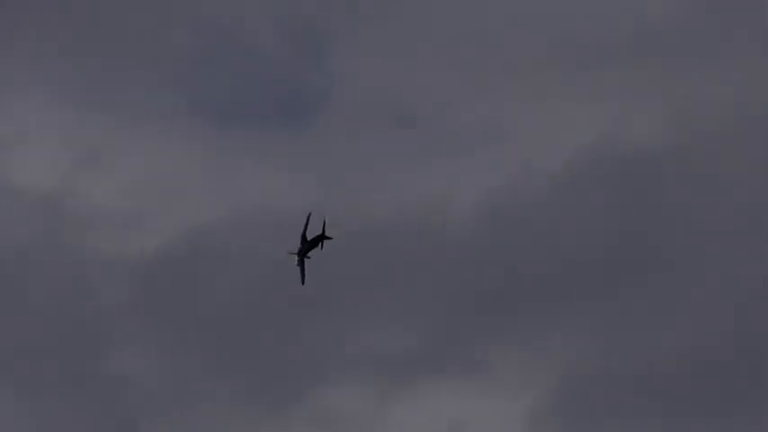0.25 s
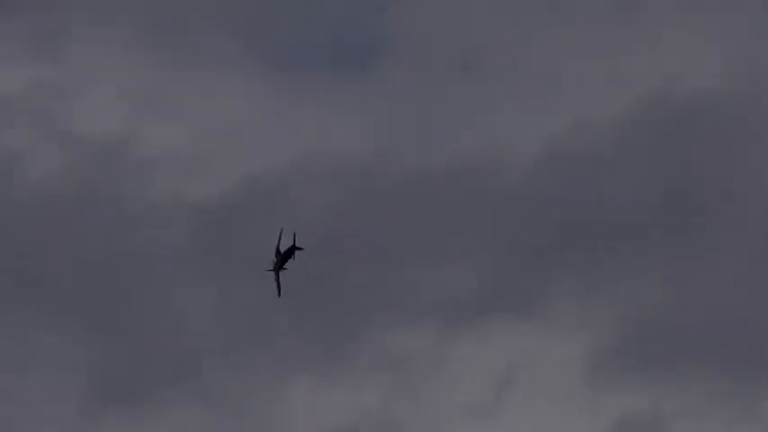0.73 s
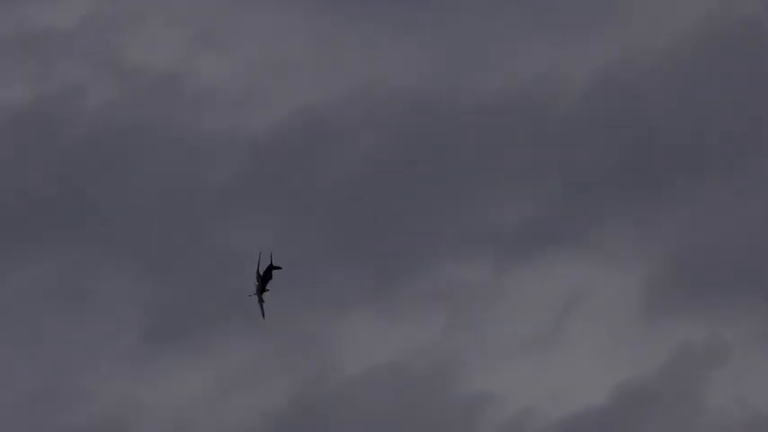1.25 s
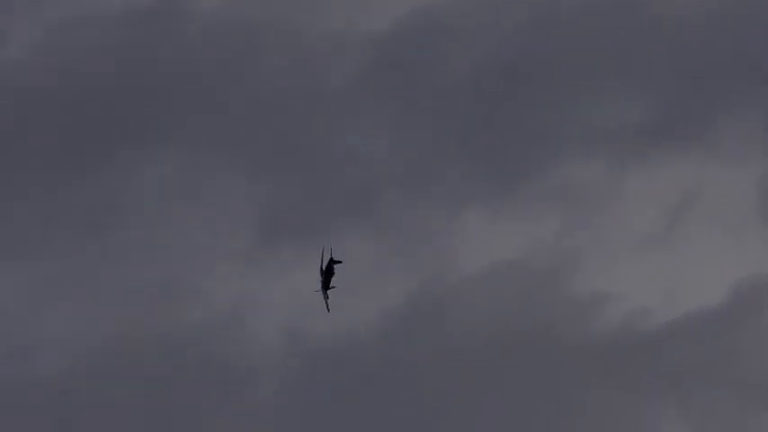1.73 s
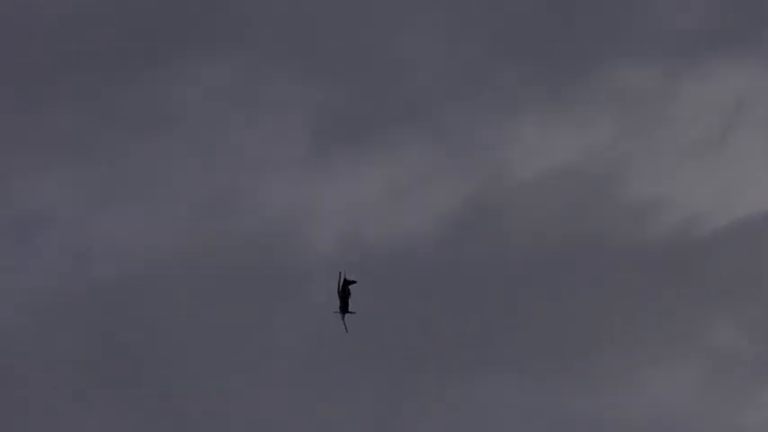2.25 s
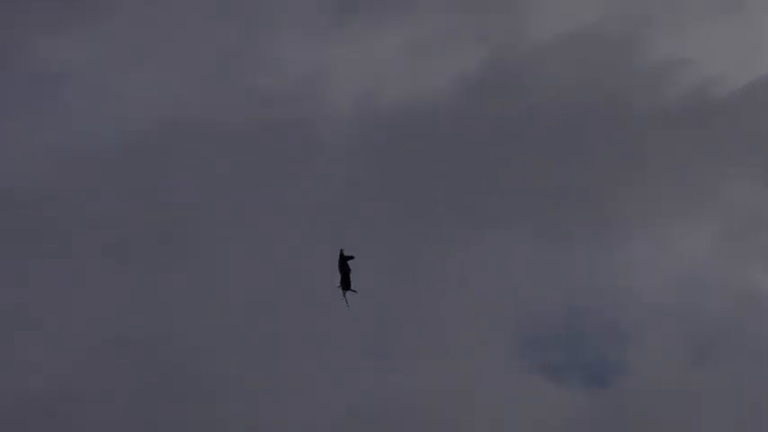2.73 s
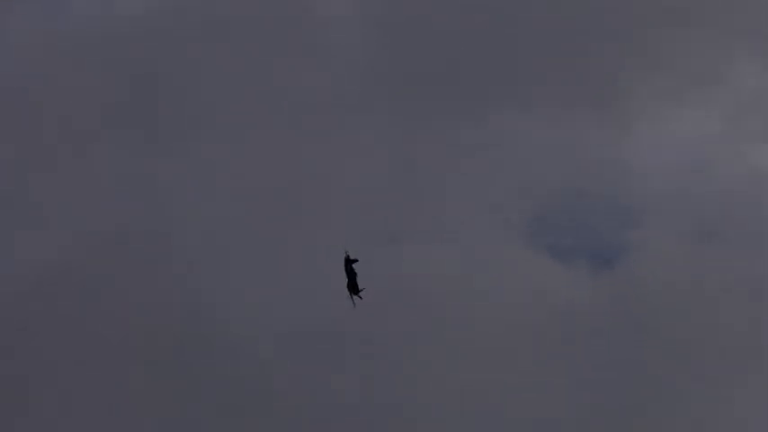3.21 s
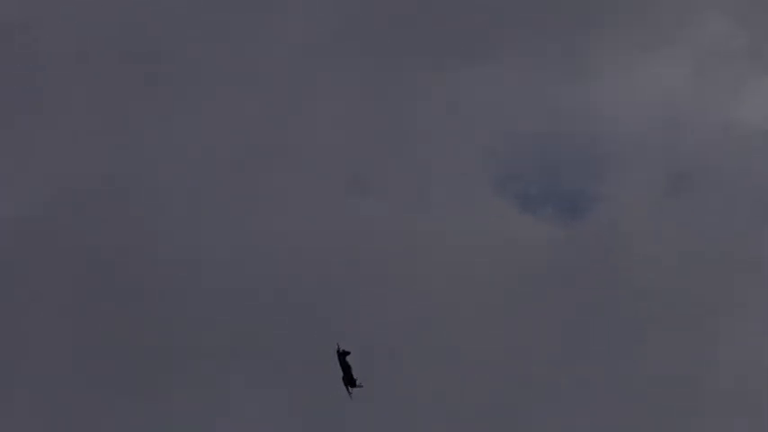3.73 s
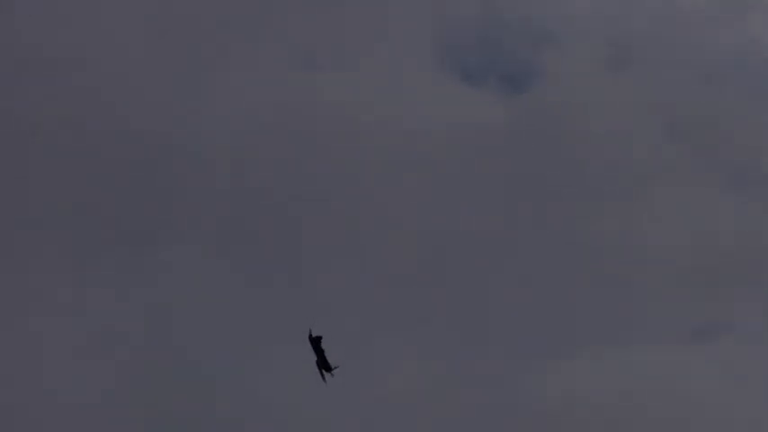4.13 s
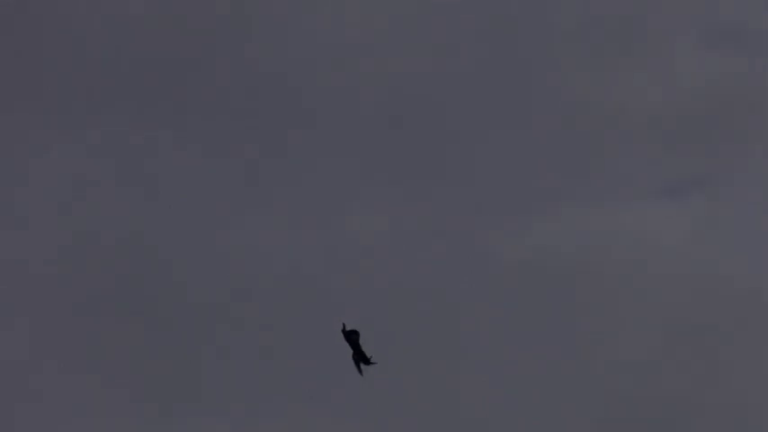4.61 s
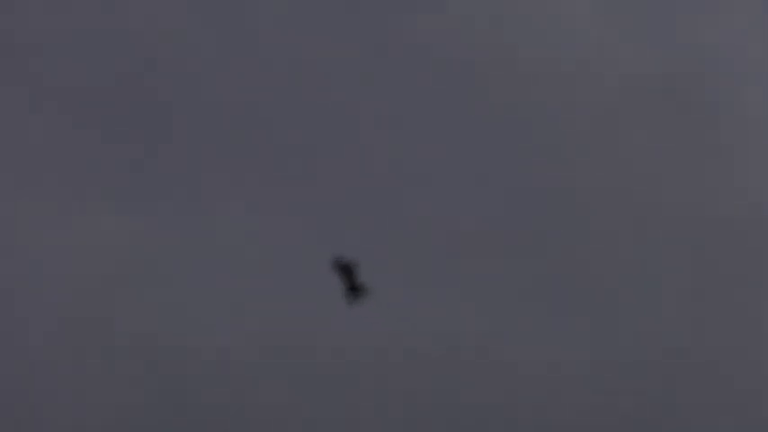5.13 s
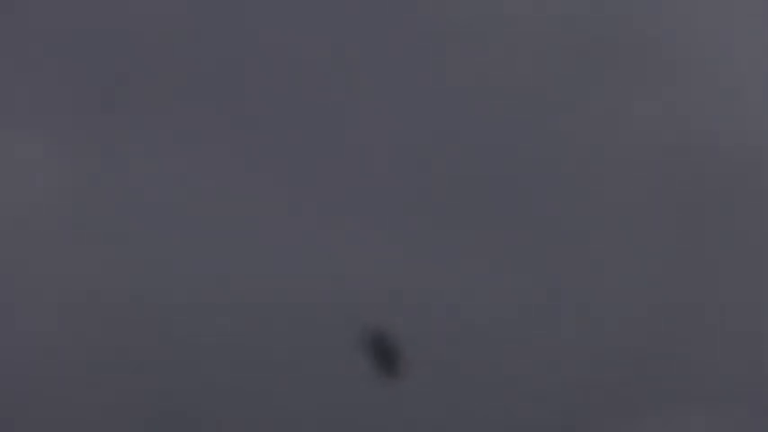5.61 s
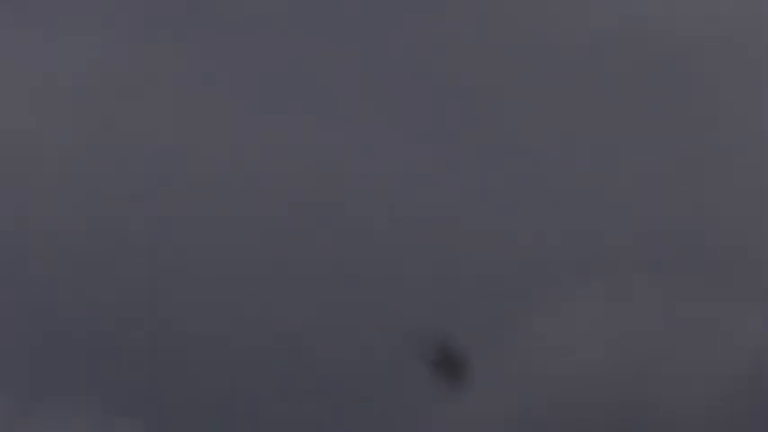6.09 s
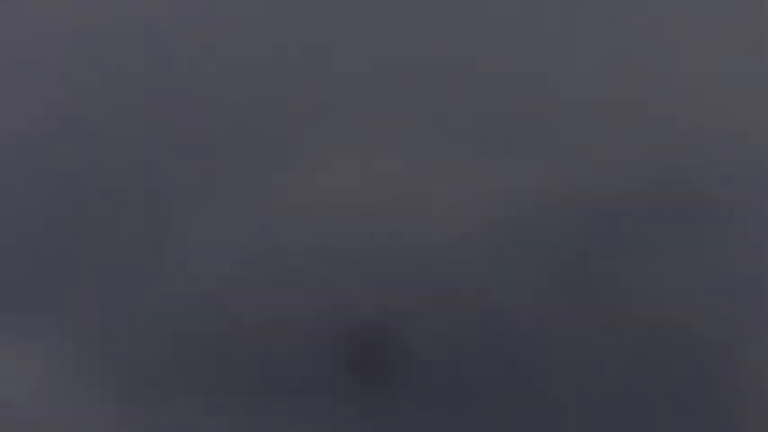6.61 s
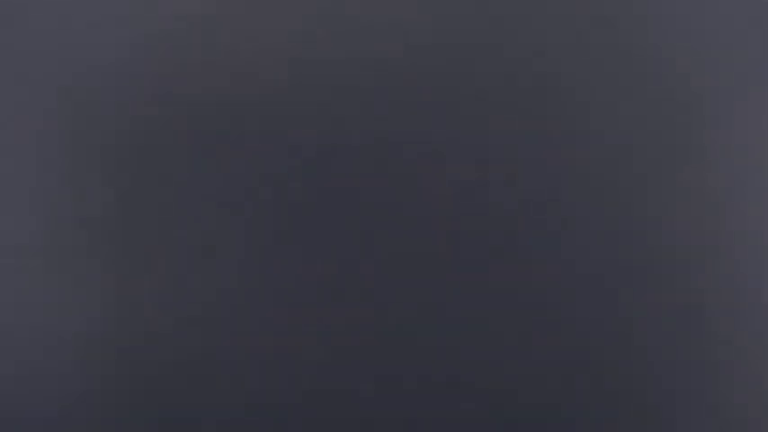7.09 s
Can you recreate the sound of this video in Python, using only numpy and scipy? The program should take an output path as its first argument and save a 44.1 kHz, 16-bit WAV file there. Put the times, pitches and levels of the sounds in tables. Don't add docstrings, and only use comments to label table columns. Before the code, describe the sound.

A large radial piston-engined plane wheels high over an open grass airfield, heard through a hand-held stereo microphone in wind. Its low, lumpy drone runs throughout, sagging slightly in pitch over the first two seconds, then very gradually rising. Above it a dull, gravelly exhaust rasp swells and fades with the air. A tight burst of hard cracks comes at 0.2-0.4 s, then scattered single barks, notably near 2.1, 3.5, 4.3 and around 6 s. A low blade hum is clear at first, faint around 4 s, and stronger again near 6.2 s. Wind thumps and dry cover rustle, crackles and snaps are busiest from 0.5 to 2.3 s, quieter around 3 s, returning near 6 s. At 4.45 s a click and split-second dropout interrupt everything. Toward 7 s the drone weakens and the rasp thins, still running at the end with a last snap.

```python
import sys
import numpy as np
from scipy import signal
from scipy.fft import rfft, irfft
from scipy.io import wavfile
from scipy.ndimage import uniform_filter1d

SR = 44100
rng = np.random.default_rng(int(sys.argv[2]) if len(sys.argv) > 2 else 0)


def volts_from_decibels(level):
    exponent = np.asarray(level, float) / 20
    return 10 ** exponent


def waveform_to_disk(signal):
    frames = np.transpose(np.atleast_2d(signal))
    scaled = np.clip(frames, -1, 1) * 32767
    samples = np.round(scaled).astype(np.int16)
    wavfile.write(sys.argv[1], SR, samples)


N = 324135
TIME = np.arange(N) / SR
CYLINDERS = 18
AIR_TOP_HZ = 2650

# (time [s], rate [Hz])
ENGINE_CYCLE = [(0.0, 17.59), (0.3, 17.624), (0.6, 17.398), (0.9, 17.318), (1.5, 17.131), (2.1, 17.017),
                (2.4, 17.033), (2.7, 17.044), (3.6, 17.049), (3.9, 17.034), (4.5, 17.12), (5.1, 17.195),
                (5.7, 17.235), (6.0, 17.201), (6.3, 17.297), (6.6, 17.354), (6.9, 17.383), (7.35, 17.375)]
# (time [s], peak [dB], ring [Hz])
HARD_BARKS = [(0.238, -18, 1170), (0.278, -15, 1020), (0.294, -12.5, 930), (0.311, -8, 730),
              (0.345, -10, 880), (0.376, -16, 937), (0.398, -14.5, 1150), (0.746, -17.5, 1750),
              (0.824, -16, 824), (1.257, -20, 1150), (1.374, -17, 1100), (1.501, -15.5, 1110),
              (2.076, -12.5, 1080), (2.732, -15, 940), (2.87, -22, 980), (3.485, -14.5, 1060),
              (3.604, -14, 1780), (3.67, -14.5, 920), (4.14, -17.5, 990), (4.197, -18, 1140),
              (4.257, -11.5, 980), (5.434, -16, 1070), (5.929, -15, 1020), (6.012, -17.5, 980),
              (6.127, -19, 930), (6.531, -18, 1030), (6.646, -18, 735), (6.706, -20, 759)]


def curve(table):
    return np.interp(TIME, *np.transpose(table))


def unit(x):
    return x / np.sqrt(np.mean(x ** 2))


def colour(x, points, size=8192):
    hz, db = np.transpose(points)
    bins_hz = np.fft.rfftfreq(size, 1 / SR)
    log_gain = np.interp(np.log(bins_hz + 1), np.log(hz), db) * np.log(10) / 20
    cepstrum = irfft(log_gain)
    cepstrum[1:size // 2] *= 2
    cepstrum[size // 2 + 1:] = 0
    response = irfft(np.exp(rfft(cepstrum)))[:size // 2]
    return signal.oaconvolve(x, response)[:N]


def band(x, lo_hz, hi_hz):
    return signal.sosfilt(signal.butter(2, [lo_hz, hi_hz], "bandpass", fs=SR, output="sos"), x)


def walk(rate):
    hold = int(SR / rate)
    held = np.repeat(rng.standard_normal(N // hold + 1), hold)
    return 1.87 * uniform_filter1d(uniform_filter1d(held, hold), hold)[:N]


def spikes(times, sizes):
    at = np.clip(times * SR, 0, N)
    i = at.astype(int)
    early = np.bincount(i, sizes * (i + 1 - at), N + 2)
    late = np.bincount(i + 1, sizes * (at - i), N + 2)
    return (early + late)[:N]


def puffs(kicks, decay_s):
    return signal.lfilter([1], [1, -np.exp(-1 / (decay_s * SR))], kicks)


def swells(s, half_s, gain_db):
    coarse = TIME[::64]
    total = np.zeros(len(coarse))
    for t, half, gain in zip(s, half_s, gain_db):
        total += gain * np.cos(np.pi / 2 * np.clip((coarse - t) / half, -1, 1)) ** 2
    return np.interp(TIME, coarse, total)


def field(x, gain_db, size=1024):
    overlap = size * 3 // 4
    hz, s, z = signal.stft(x, SR, nperseg=size, noverlap=overlap)
    shaped = z * volts_from_decibels(gain_db(hz[:, None] + 1, s))
    return signal.istft(shaped, SR, nperseg=size, noverlap=overlap)[1][..., :N]


def plane():
    # (time [s], level [dB])
    drone_level = [(0.0, -22), (0.04, -25), (0.14, -21.5), (1.08, -22.5), (1.16, -18), (1.64, -21),
                   (2.84, -20), (4.2, -21), (4.44, -24), (4.56, -21), (5.34, -23.5), (6.49, -21),
                   (7.0, -26), (7.35, -25.5)]
    # (time [s], half-length [s], gain [dB], extra gain of the top [dB])
    calm_pockets = [(0.0, 0.11, 5.5, 13), (0.303, 0.4, 6.5, 1), (0.876, 0.45, 3.5, 4),
                    (1.469, 0.22, 5.5, 1.5), (2.085, 0.75, 6, 3.5), (2.616, 0.18, 2.5, 0),
                    (3.379, 0.77, 3.5, -3.5), (3.621, 0.22, 3.5, 9), (3.846, 0.15, 2.5, 7.5),
                    (4.22, 0.18, 5.5, 0), (4.744, 0.22, 1.5, 1), (5.603, 0.32, 5, 5.5),
                    (5.856, 0.72, 1.5, -4.5), (6.158, 0.1, 4, -4.5), (6.6, 0.19, 4.5, -4),
                    (6.86, 0.2, -5.5, 6.5), (7.125, 0.14, 0, -0.5)]
    # (frequency [Hz], gain [dB])
    body_shade = [(200, 0), (490, -1), (740, -3), (1130, -9.5), (1710, -11.5), (2600, -10), (5000, 3.5)]
    rasp_db, upper_db, roar_db = -30.5, -40, -26.5
    roar_fade_db_per_s, roar_swell_share = 1.5, 0.25
    lull_s, lull_db = .012, -3.5

    s, half_s, gain_db, top_db = np.transpose(calm_pockets)
    clear_db = swells(s, half_s, gain_db)
    times, stub_db = firings()
    roar, low, high = rasp(times, stub_db)
    gas = roar * volts_from_decibels(roar_db - roar_fade_db_per_s * TIME + roar_swell_share * clear_db)
    gas += mouth(low)
    gas += low * volts_from_decibels(rasp_db + clear_db)
    gas += band(high, 467, 2 * AIR_TOP_HZ) * volts_from_decibels(upper_db - 26.0 + 0.74 * clear_db)
    gas += band(high, 467, AIR_TOP_HZ) * volts_from_decibels(upper_db + clear_db + swells(s, half_s, top_db))
    direct, scattered = gas

    count = len(HARD_BARKS)
    lulls = swells([bark[0] - lull_s / 2 for bark in HARD_BARKS], [lull_s] * count, [lull_db] * count)
    direct = direct * volts_from_decibels(lulls) + barks() + propeller()
    direct += drone(times, stub_db) * volts_from_decibels(curve(drone_level) + 1.5)
    right = direct + volts_from_decibels(-8.0) * scattered + volts_from_decibels(-2.5) * band(scattered, 1600, 3000)
    return field(np.array([direct, colour(right, body_shade)]), passing_tints, size=4096)


def firings():
    # (back [dB], wing [dB], belly [dB], tail [dB])
    stub_strength = [(-25.0, -23.0, -22.0, -12.0), (-13.0, -13.0, -16.0, -24.0), (-5.0, -5.0, -7.0, -5.0),
                     (-12.0, -12.0, -24.0, -9.0), (-9.0, -7.0, -9.0, -5.0), (-13.0, -15.0, -15.0, -7.0),
                     (-26.0, -13.0, -7.0, -1.0), (-17.0, -15.0, -5.0, -6.0), (-17.0, -29.0, -21.0, -7.0),
                     (-9.0, -10.0, -16.0, -13.0), (-15.0, -13.0, -14.0, -3.0), (-18.0, -18.0, -13.0, -10.0),
                     (-21.0, -11.0, -6.0, -8.0), (-12.0, -29.0, -13.0, -19.0), (-16.0, -14.0, -10.0, -14.0),
                     (-18.0, -17.0, -20.0, -16.0), (-16.0, -21.0, -13.0, -18.0),
                     (-14.0, -8.0, -10.0, -13.0)]
    stub_lateness = [(-1.54, 0.07, -0.18, -0.65), (-0.52, -0.4, -0.54, 0.04), (-0.59, -0.48, -0.35, -0.2),
                     (-0.92, -0.69, -0.31, -0.25), (-0.32, -0.32, -0.18, 0.08), (-0.9, -0.93, -1.0, -1.32),
                     (-1.36, -1.04, -1.32, -1.45), (0.0, -0.21, -0.43, -0.62), (-0.22, 0.06, -1.36, -1.38),
                     (-0.41, -0.22, -0.06, 0.22), (0.49, 0.13, -0.14, -0.25), (-0.81, 0.01, -0.09, -0.38),
                     (-0.87, -0.44, -0.35, -0.31), (-0.29, -0.01, -0.12, 0.04), (-0.69, -0.6, -0.57, -0.34),
                     (-1.23, -1.07, -0.81, -0.52), (-0.73, -0.26, -0.16, -0.36),
                     (-0.04, -0.26, -0.22, 0.03)]
    aspect_s = (.5, 2.4, 4.6, 6.8)
    turns = np.cumsum(curve(ENGINE_CYCLE)) / SR
    cycle = np.arange(int(turns[-1]) + 1)
    middle = np.interp(cycle + .5, turns, TIME)

    def seen(table):
        return np.transpose([np.interp(middle, aspect_s, row) for row in table])

    slot = np.arange(CYLINDERS) + seen(stub_lateness)
    times = np.interp(cycle[:, None] + slot / CYLINDERS, turns, TIME, left=0, right=N)
    return times, seen(stub_strength)


def drone(times, stub_db):
    # (frequency [Hz], gain [dB])
    stub_ring = [(20, -50), (50, -28), (90, -20), (130, -21), (190, -1), (250, -3), (310, -4), (360, -24),
                 (430, -8), (500, -27), (700, -35), (1500, -47), (4000, -72)]
    scatter_db, jitter_s, lead_s, air_hz = 1.0, .00008, .0009, 3500
    late, strong = rng.standard_normal((2,) + times.shape)
    fired_s = times - lead_s + jitter_s * late
    kicks = spikes(fired_s.ravel(), volts_from_decibels(stub_db + scatter_db * strong).ravel())
    sound = band(colour(kicks, stub_ring), air_hz / 70, air_hz) * volts_from_decibels(0.05 * scatter_db * walk(30))
    return sound / np.sqrt(uniform_filter1d(sound ** 2, SR // 3))


def rasp(times, stub_db):
    # (frequency [Hz], density [dB per Hz])
    gas_spectrum = [(60, -17.5), (120, -17), (300, 6.5), (480, -0.5), (620, -3), (720, -5.5), (860, -3.5),
                    (970, -3), (1430, -9.5), (1760, -9.5), (2200, -23.5), (2400, -22), (2700, -33.5),
                    (3300, -36), (5000, -69.5)]
    depth, scatter_db, puff_s, steady, patchy_db = 0.5, 2.0, 0.003, .6, 1.3
    kick_db = depth * stub_db + scatter_db * rng.standard_normal(times.shape)
    kicks = spikes(times.ravel(), volts_from_decibels(kick_db).ravel())
    gate = steady + unit(puffs(kicks, puff_s))
    paths = np.array([ground(colour(gate * rng.standard_normal(N), gas_spectrum)) for _ in range(2)])
    edges_hz = 580 * 2 ** (np.arange(-7, 10) / 3)
    parts = []
    for k in range(len(edges_hz) - 1):
        part = band(paths, edges_hz[k], edges_hz[k + 1])
        parts.append((-1) ** k * part * volts_from_decibels(patchy_db * walk(12)))
    return unit(sum(parts[:7])), unit(sum(parts[7:11])), unit(sum(parts[11:]))


def ground(x):
    lag_s, wander_s, share = .00406, .00008, .42
    return x + share * np.interp(TIME - lag_s - wander_s * walk(2.28), TIME, x)


def mouth(gas):
    # (time [s], half-length [s], gain [dB], ring [Hz])
    facing_moments = [(0.35, 0.16, 15, 960), (0.95, 0.13, 12, 1130), (1.43, 0.21, 16, 1110),
                      (2.13, 0.3, 12, 1075), (2.662, .1, 13, 915), (3.502, 0.63, 11, 1028),
                      (4.278, 0.47, 16.5, 1007), (4.832, 0.14, 17, 940), (5.43, 0.2, 18.5, 1000),
                      (5.698, .2, 16, 1004), (5.856, 0.15, 14, 1140), (5.967, 0.21, 13, 985),
                      (6.154, 0.066, 12, 940), (6.266, 0.12, 19, 1030), (6.58, 0.1, 11, 1040)]
    width_hz = 170
    out = 0
    for s, half_s, gain_db, ring_hz in facing_moments:
        ring = unit(band(gas, ring_hz - width_hz / 2, ring_hz + width_hz / 2))
        out = out + ring * (volts_from_decibels(swells([s], [half_s], [gain_db])) - 1)
    return out * volts_from_decibels(-48)


def barks():
    # (time [s], peak [dB], ring [Hz])
    faint_cracks = [(0.563, -16, 810), (0.691, -19, 972), (0.857, -19, 1100), (0.942, -19, 1100),
                    (1.038, -22, 929), (1.579, -20, 1350), (2.026, -17, 1160), (2.166, -23, 1080),
                    (2.371, -16, 1150), (2.613, -19, 810), (2.667, -20, 1010), (3.452, -18.5, 904),
                    (3.642, -17, 980), (5.36, -17, 1020), (6.053, -21, 1030), (6.156, -21, 910),
                    (6.196, -21, 956), (6.552, -17, 1020)]
    out, t = np.zeros(N), TIME[:SR // 40]
    shape = (1 - np.exp(-t / 0.00055)) * np.exp(-t / 0.0029)
    for s, peak_db, ring_hz in HARD_BARKS + faint_cracks:
        i = int(s * SR)
        out[i:i + len(t)] -= volts_from_decibels(peak_db + 4.5) * shape * np.cos(2 * np.pi * ring_hz * t)
    return band(out, 500, 2600)


def propeller():
    # (time [s], level [dB])
    blade_level = [
        (0.0, -24),
        (0.5, -32),
        (1.3, -28.5),
        (2.45, -33),
        (4.2, -37.5),
        (5.2, -33.5),
        (6.2, -25.5),
        (6.7, -33),
        (7.2, -27),
    ]
    order, lag_turns = 7, .42
    turns = np.cumsum(curve(ENGINE_CYCLE)) / SR
    return np.cos(2 * np.pi * (order * turns - lag_turns)) * volts_from_decibels(curve(blade_level) - 2.0)


def passing_tints(hz, s):
    # (time [s], half-length [s], centre [Hz], gain [dB])
    tint_patches = [(0.03, 0.081, 1100, 14.5), (0.12, 0.29, 855, -9.5), (0.55, 0.43, 315, -2),
                    (0.56, 0.59, 473, 5), (0.714, 0.15, 1110, -7), (0.93, 0.25, 710, -5.5),
                    (0.98, 0.089, 1160, 5), (1.15, 0.28, 364, -10.5), (1.436, 0.28, 1290, 4),
                    (1.51, 0.35, 320, 2.5), (1.56, 0.88, 342, -9), (1.702, 1, 540, -8.5),
                    (2.213, 0.071, 760, -5), (2.178, 0.68, 2220, -7), (2.22, 0.56, 1712.0, -3),
                    (2.254, 0.9, 1240, -3), (2.355, 0.66, 376, 6), (2.417, 0.18, 760, -8.5),
                    (2.515, 0.52, 830, 2.5), (2.65, 0.3, 424, 3), (2.88, 0.59, 1660, -4),
                    (3.25, 0.8, 1066, 2.5), (3.466, 0.57, 140, 4.5), (3.49, 0.12, 880, 6),
                    (3.584, 0.65, 458.0, 3), (3.63, 0.99, 372, 5.5), (3.663, 0.33, 302, -4.5),
                    (3.672, 0.7, 1560, 1.5), (4.046, 0.12, 1120, 9), (4.23, 0.12, 1390, 9.5),
                    (4.238, 0.6, 1950, 5.5), (4.57, 0.43, 680, 6.5), (4.738, 0.31, 473, 5.5),
                    (5.09, 0.17, 446, -4), (5.6, 0.3, 850, -5.5), (5.45, 0.15, 323, -5),
                    (5.5, 0.25, 2430, -7), (5.62, 0.34, 1510, 4.5), (5.788, 0.21, 313, 2.5),
                    (5.91, 0.18, 970, 3), (5.956, 0.32, 457, -5), (6.06, 0.28, 2200, 8),
                    (6.5, 0.5, 1290, -2.5), (6.465, 0.16, 1700, -13), (6.56, 0.33, 1070, 0.5),
                    (6.644, 0.21, 490, 9), (6.73, 0.55, 1920, 3), (6.98, 0.32, 920, -5),
                    (6.99, 0.31, 1625.0, -6), (7.04, 0.81, 368, 6.5)]
    width_octaves = .11
    at, half_s, centre, gain_db = np.transpose(tint_patches)[:, :, None]
    reach = np.exp(-.5 * (np.log2(hz / centre.T) / width_octaves) ** 2)
    return reach @ (gain_db * np.cos(np.pi / 2 * np.clip((s - at) / half_s, -1, 1)) ** 2)


def wind():
    # (time [s], level [dB])
    gust_level = [(0.0, -61), (0.76, -55.5), (1.11, -59), (1.72, -56), (2.74, -67.5), (3.52, -67.5),
                  (3.62, -69.5), (3.87, -69.5), (4.5, -61.5), (4.89, -61.5), (5.08, -58.5), (5.71, -64.5),
                  (5.98, -55), (6.16, -54), (6.84, -65), (7.35, -62)]
    # (time [s], half-length [s], gain [dB])
    cover_flaps = [(0.0, 0.034, 18.5), (0.28, 0.035, 5), (0.58, .04, 2), (0.704, 0.048, 4),
                   (0.86, .05, 1.5), (1.201, 0.033, 3.5), (1.415, 0.1, 6), (1.636, 0.071, 5),
                   (1.777, 0.041, 5.5), (2.06, 0.086, 3.5), (2.341, 0.074, 5.5), (2.7, 0.11, 5),
                   (3.191, 0.023, 9.5), (3.312, 0.051, 6.5), (3.556, 0.12, 5.5), (4.057, 0.039, 8),
                   (5.096, 0.069, 2), (5.76, 0.043, 6), (5.863, 0.019, 6.5), (5.899, 0.027, 9.5),
                   (5.935, 0.022, 7), (6.07, 0.044, 5.5), (6.208, 0.031, 1.5), (6.825, 0.053, 8),
                   (7.147, 0.054, 4.5), (7.34, .04, 6)]
    # (time [s], half-length [s], gain [dB])
    port_thumps = [(0.0, 0.14, 9), (0.31, 0.089, 6), (0.615, 0.072, 2.5), (0.9, 0.071, 5),
                   (1.352, 0.12, 8.5), (1.599, 0.034, 6), (1.795, 0.18, 5.5), (2.115, 0.038, 6.5),
                   (3.098, 0.64, -4.5), (3.75, 0.12, 5.5), (5.748, .15, 3.5), (4.289, 0.23, 8.5),
                   (4.59, 0.08, 11), (5.482, 0.13, 9), (5.933, 0.15, 8), (6.22, 0.054, -1.5),
                   (6.443, 0.094, 1.5), (6.761, 0.053, 2.5), (7.35, 0.086, 12)]
    # (frequency [Hz], gain [dB])
    buffet_spectrum = [(20, -54.5), (45, -37), (62, -1.5), (100, -0.5), (170, 4), (300, -18), (600, -27),
                       (2000, -57)]
    base_db, buffet_per_rustle = -40, 0.32

    gust_db = curve(gust_level)
    common, left, right = (unit(colour(rng.standard_normal(N) * volts_from_decibels(2.0 * walk(8.4)), buffet_spectrum))
                           for _ in range(3))
    ports = common + .8 * np.array([left, right])
    buffet_db = base_db + buffet_per_rustle * (gust_db - np.mean(gust_db))
    buffet_db = buffet_db + swells(*np.transpose(port_thumps))
    rustle_db = gust_db + swells(*np.transpose(cover_flaps)) - 0.84
    return ports * volts_from_decibels(buffet_db) + rustle(rustle_db) * volts_from_decibels(10.5)


def rustle(level_db):
    # (time [s], peak [dB], left minus right
    # [dB])
    crackles = [(0.1603, -41, 2), (0.254, -43.5, -3.5), (0.2662, -39, 4.5), (0.374, -45, 4.5),
                (0.3865, -43, -1), (0.5385, -35, 0), (0.589, -32.5, 0), (0.648, -38.5, 0),
                (0.725, -39.5, -0.5), (0.7522, -43, -2), (0.806, -42.5, 2.5), (0.848, -40.5, 3.5),
                (0.874, -39, 6), (0.912, -35, 2), (1.163, -33, -0.5), (1.2073, -33, 1), (1.295, -45, 5),
                (1.329, -36, -5), (1.3567, -35.5, -1), (1.4092, -39.5, 0), (1.456, -34.5, 3.5),
                (1.485, -39.5, 6.5), (1.6127, -38.5, 3), (1.6337, -36.5, 3.5), (1.72, -43, -4),
                (1.7587, -35.5, 2), (1.762, -36.5, 0.5), (1.8553, -43.5, 2.5), (1.8796, -42, 2),
                (1.93, -45, 0.5), (1.9557, -43, 4.5), (1.97, -44.5, -1.5), (1.9939, -44.5, -1),
                (2.015, -37.5, 2.5), (2.0818, -39.5, 1.5), (2.1723, -39.5, -4), (2.221, -47, 2),
                (2.339, -41.5, 4), (2.73, -42, 5), (3.182, -44, 0.5), (3.48, -46.5, -6), (4.0464, -39, 6.5),
                (4.4515, -31, -2.5), (4.575, -40, 2.5), (4.6756, -37.5, -0.5), (4.897, -44.5, 2.5),
                (5.0687, -41, -3.5), (5.1841, -45.5, 1), (5.3802, -41.5, 0.5), (5.8566, -38.5, -1.5),
                (5.8942, -36, -0.5), (6.02, -38.5, -0.5), (6.0443, -38.5, -5.5), (6.2054, -41, -3.5),
                (6.787, -47.5, -0.5), (7.3113, -47, -5)]
    # (time [s], peak [dB], left minus right
    # [dB])
    fibre_snaps = [(0.158, -49, -4.5), (0.2558, -54.5, -5.5), (0.2558, -48, -3), (0.3686, -51, -1.5),
                   (0.5387, -42.5, -4), (0.5716, -43.5, -3.5), (0.589, -40, -3.5), (0.6479, -44.5, -2),
                   (0.7243, -42, -4), (0.849, -46.5, -3.5), (0.9042, -39, -3), (0.9118, -43, -2.5),
                   (1.1617, -31.5, -4.5), (1.2067, -39, -0.5), (1.2565, -46.5, -3), (1.3289, -33.5, -4.5),
                   (1.3548, -51, -6.5), (1.3548, -44, -3.5), (1.4102, -42.5, -2.5), (1.456, -38.5, -1.5),
                   (1.484, -45, -1), (1.612, -42, -3.5), (1.6521, -45, -4.5), (1.7584, -46.5, 0),
                   (1.7586, -39, -1), (1.868, -49.5, -2.5), (1.8791, -45, -3.5), (1.93, -40.5, -5.5),
                   (1.9555, -48, -2.5), (1.9684, -44.5, -5), (1.9939, -45, -4.5), (2.0807, -49, -7),
                   (2.0822, -45, -3), (2.1715, -44, -2.0), (2.362, -47.5, -2.0), (2.6489, -48, -6),
                   (3.1815, -48.5, -4.5), (3.48, -48, -4), (4.0464, -49.5, -4.5), (4.4512, -32.5, -3.5),
                   (4.574, -46, -3.5), (4.674, -43, -5.0), (5.0676, -43.5, -4), (5.7683, -46.5, -3),
                   (5.8587, -48.5, 0.5), (5.859, -41, -3.0), (5.893, -39.5, -3), (5.9394, -39.5, -3.5),
                   (6.0195, -41.5, -3.5), (6.043, -42, -2.5), (6.0686, -41, -3.5), (6.1255, -46, -4.5),
                   (6.2053, -41.5, -3.0), (6.7865, -51.5, -4.5), (7.311, -51, -5), (7.3253, -33.5, 0.5)]
    # (frequency [Hz], gain [dB])
    right_cover = [(3000, -6.5), (6000, -1), (9000, 1.5), (12000, 8.5), (15000, 12)]
    # (frequency [Hz], density [dB per Hz])
    level_tone = [(1500, -5.5), (3000, 2), (4500, 1), (6000, -2.5), (8000, -9.5), (10000, -10.5),
                  (13000, -22.5), (15500, -28.5)]
    # (frequency [Hz], density [dB per Hz])
    tilted_tone = [(1500, 1.5), (3300, -2.5), (4200, -0.5), (4700, -3.5), (5800, 1), (7200, -3.5),
                   (8300, -11), (9800, -7), (15500, -24.5)]
    grain_db, flicker_db, grain_samples = 2.4, 1.4, 60
    tick_rise_s, tick_fall_s, snap_s = .0005, .002, .0003
    tilt_s, tilt_length_s = 4.1, 0.18

    chance = np.minimum(rng.exponential(size=(3, N // grain_samples + 1)), 5.5)
    grains = volts_from_decibels(grain_db * chance).repeat(grain_samples, axis=1)[:, :N]
    hiss = rng.standard_normal((3, N)) * grains * volts_from_decibels(flicker_db * walk(40))
    hiss = unit(field(hiss[0] + 0.7 * hiss[1:], blotches)) * volts_from_decibels(level_db)

    crack = signal.lfilter([1, -.7], [1], rng.standard_normal(N)) * volts_from_decibels(-9.0)
    tick_at, tick_db, tick_pan_db = np.transpose(crackles)
    snap_at, snap_db, snap_pan_db = np.transpose(fibre_snaps)
    for channel, side in enumerate((1, -1)):
        ticks = spikes(tick_at, volts_from_decibels(tick_db - 22.0 + side * tick_pan_db / 2))
        hiss[channel] += crack * puffs(puffs(ticks, tick_rise_s), tick_fall_s)
        snaps = spikes(snap_at, volts_from_decibels(snap_db + 8.0 + side * (snap_pan_db + 4.0) / 2))
        hiss[channel] += crack * puffs(snaps, snap_s)
    hiss[1] = colour(hiss[1], right_cover)
    tilted = np.clip((TIME - tilt_s) / tilt_length_s, 0, 1)
    return np.array([(1 - tilted) * colour(v, level_tone) + tilted * colour(v, tilted_tone) for v in hiss])


def blotches(hz, s, depth_db=2.5):
    z = rng.standard_normal((hz.size, s.size))
    z = uniform_filter1d(uniform_filter1d(z, size=12, axis=0), size=6, axis=1)
    return depth_db * unit(z)


def scene():
    return plane() + wind()


def low_pass(x):
    return signal.sosfilt(signal.butter(12, 15800, fs=SR, output="sos"), x)


def record(dry):
    dropout_s, recover_s, cut_s, click_s = 4.4523, 0.024, .002, .0006
    jump, left_over = .11, .12
    sound = signal.lfilter(*signal.iirnotch(592, 2.5, fs=SR), dry)
    since = TIME - dropout_s
    cut = np.exp(np.minimum(since, 0) / cut_s) * (since < 0)
    gain = np.where(since < 0, 1 - cut, np.clip(since / recover_s, left_over, 1))
    click = jump * cut ** (cut_s / click_s)
    return low_pass(sound * gain + click)


dry = scene()
out = record(dry)
waveform_to_disk(out)
```